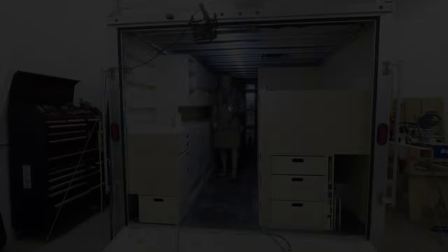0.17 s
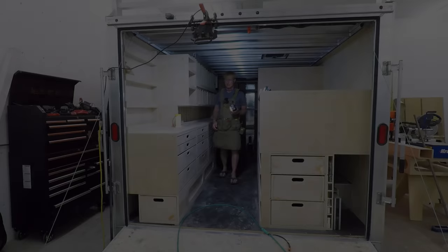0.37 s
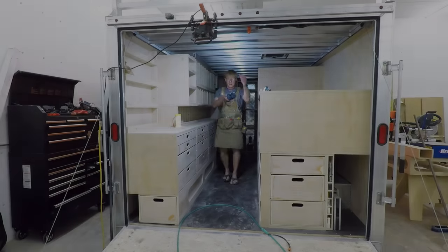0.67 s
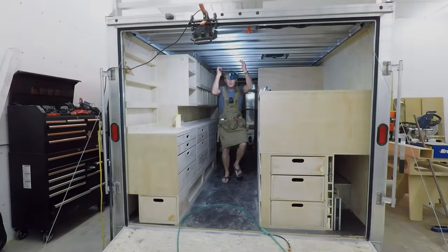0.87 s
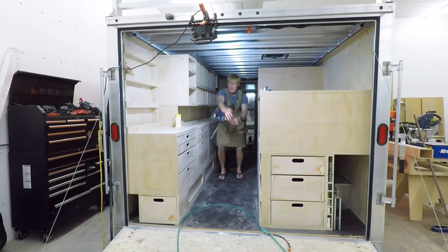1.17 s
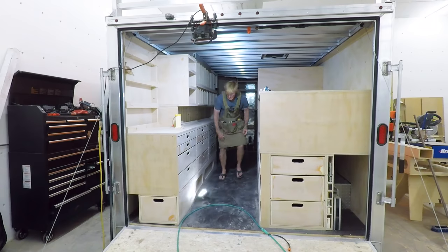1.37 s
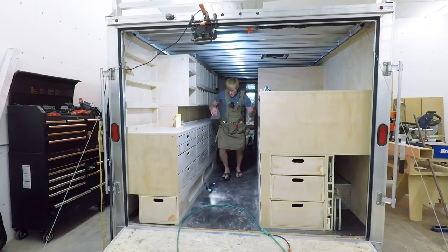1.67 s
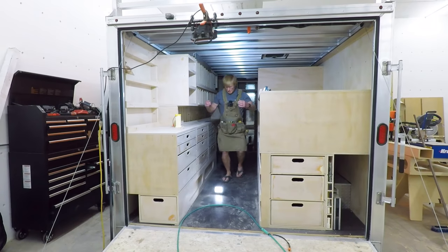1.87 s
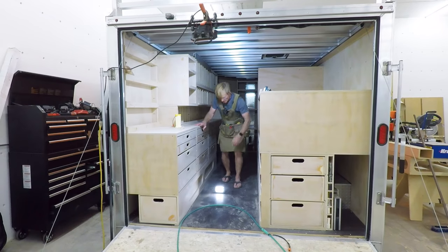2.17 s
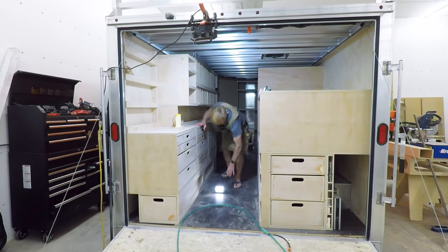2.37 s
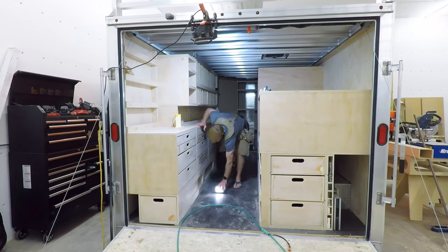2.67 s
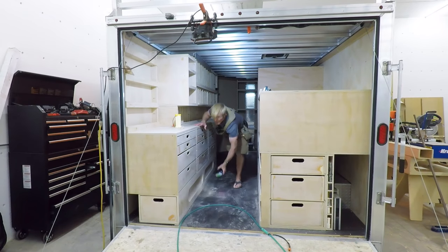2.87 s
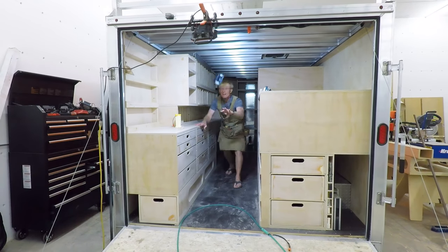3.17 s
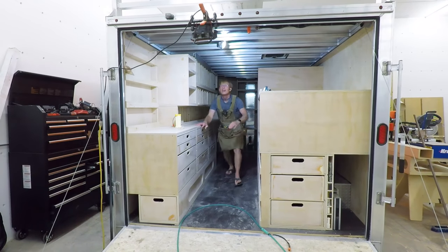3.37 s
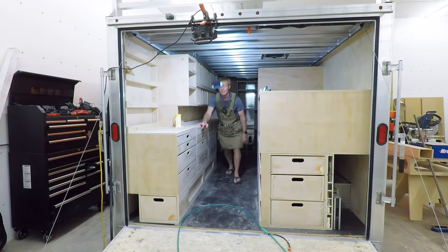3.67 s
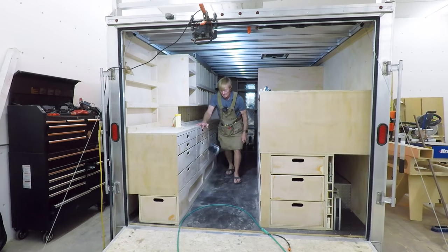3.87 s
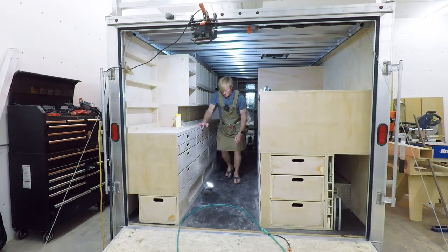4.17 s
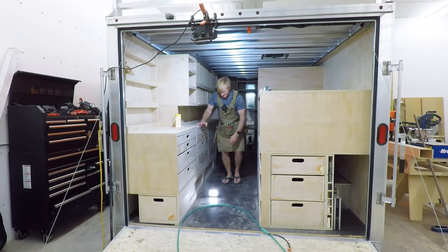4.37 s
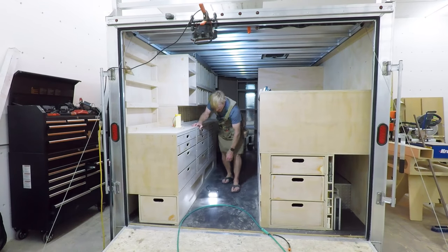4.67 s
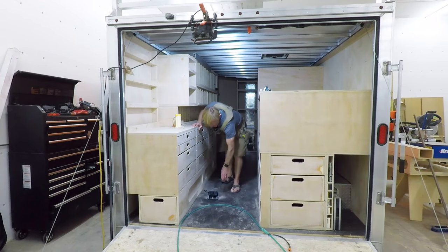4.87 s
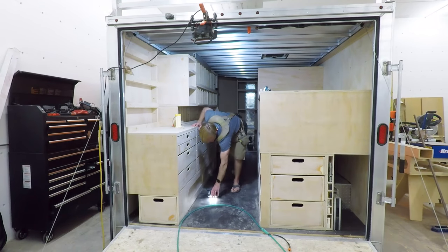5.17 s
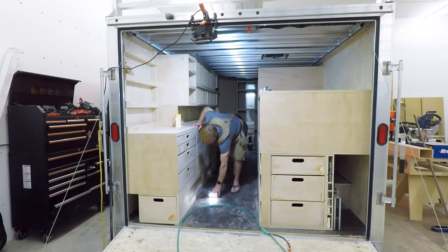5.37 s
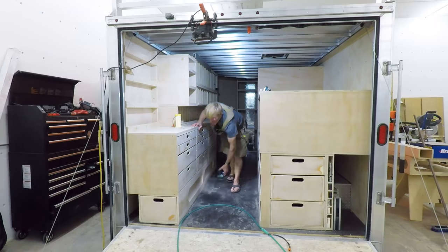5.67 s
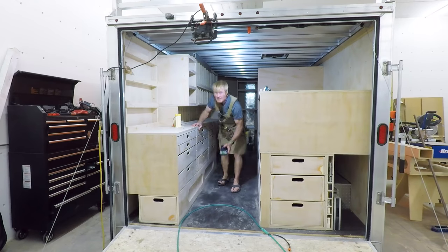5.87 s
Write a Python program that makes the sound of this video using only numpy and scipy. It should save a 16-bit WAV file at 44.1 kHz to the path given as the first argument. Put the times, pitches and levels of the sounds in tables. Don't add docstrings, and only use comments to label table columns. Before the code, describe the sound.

A hard, heavy object is dropped twice on a hollow wooden trailer floor. Each landing is a sharp crack with a dense woody thud, low body boom and long shop echo, followed by weaker knocks. Between and afterwards come small clicks, cable and cloth rustle and soft footfalls. A fixed microphone some way off clips the blows and pulls its level down, slowly recovering.

```python
import sys
import numpy as np
from scipy import signal
from scipy.fft import rfft, irfft, next_fast_len
from scipy.io import wavfile
from scipy.ndimage import map_coordinates

SR = 44100
rng = np.random.default_rng(int(sys.argv[2]) if len(sys.argv) > 2 else 0)


def store_wav(level_fs):
    pcm = np.round(np.clip(np.atleast_2d(level_fs), -1, 1) * 32767)
    wavfile.write(sys.argv[1], SR, pcm.T.astype(np.int16))


def invert_db(level):
    return 10 ** (np.asarray(level, dtype=float) / 20)


N = 265658


# start_s, dip_ahead_db, deep_pull_db, lasting_pull_db
SLAM_PULLS = [
    (1.3537, 13, 9.5, 8),
    (3.357, -1, -2, 5.5),
    (3.9799, 19, 8, 4.5),
]
REST_DB, DIP_AHEAD_S, DEEPEST_S, GRAB_S, CREEP_S = 3, .012, 0.089, 0.1, 1.69
FADE_S, FADE_DB_PER_S, OPEN_S = 0.78, 34.5, 0.19
TOP_HZ = 15400

# pitch_hz, level_db (per Hz)
HUSH_COLOUR = [(15, -58), (25, 5.5), (50, -2), (164, -13), (240, -14.5), (331, -16.5), (495, -17.5),
               (1660, -22.5), (2700, -24), (10100, -32), (15500, -36.5)]
HUSH_DB = -55

# start_s, peak_db, panel_hz, brightness_db_per_octave, ring_length (factor)
HARD_BLOWS = [(.646, -29.5, 610, 1.5, .21), (.712, -27, 400, 2, 0.33), (1.023, -32, 963, 7, 0.76),
              (1.301, -37, 600, -0.5, .5), (1.3536, 2.5, 187, -1.5, 1.7), (1.555, -36, 332, -1.4, 0.51),
              (1.709, -6, 289, -4.5, 1.1), (1.834, -11.5, 186.3, -1.6, 0.51), (1.907, -23, 214, -2.5, 0.5),
              (3.033, -41, 476, 2, .32), (3.29, -37.5, 300, 2, 0.24), (3.357, -9, 461, -1, 0.36),
              (3.98, 4.5, 520, -2.2, 0.8), (4.0294, -9, 420, 1.5, 0.82), (4.25, -14.5, 445, -1.2, 0.55),
              (4.34, -17.5, 162, -1, 1.3)]
# start_s, peak_db, panel_hz, brightness_db_per_octave, ring_length (factor)
SOFT_LANDINGS = [(1.088, -26, 395, -1.5, 0.34), (1.128, -22, 454, -1, 1.3), (1.361, .4, 400, -1.5, 1.4),
                 (1.398, -10, 220, -2.5, 1.1), (2.54, -37, 180, 2.5, 1), (2.691, -36, 161, 2, 0.72),
                 (3.129, -36, 505, 4.5, 1), (3.378, -17, 301, -.5, .5), (3.99, -2.5, 622, -2.3, 0.98),
                 (4.799, -31, 279, 0, 1.3), (5.098, -27.5, 233, -7, 1.16)]
HARD_RISE_S, SOFT_RISE_S = 0.0013, 0.0048
# pitch_hz, level_db, t60_s
PANEL_TONES = [(133, -3, 0.39), (157.6, 2, 0.17), (224, -13, 0.067), (290, 0.5, 0.18), (392, 1, 0.18),
               (455.4, -2.5, 0.29), (564, -21, 0.04), (637, -32, 0.036), (880, -52, .1), (1110, -25, .1)]
# pitch_hz, level_db (per Hz)
THUD_COLOUR = [(24, -38.5), (40, -4.5), (179, -2), (417, -5), (1310, -18.5), (1640, -23), (2110, -21.5),
               (6160, -33.5), (6980, -35.5), (14000, -45.5), (15500, -63.5)]
# pitch_hz, t60_s
THUD_LENGTH = [(60, 0.36), (300, 0.2), (1000, 0.22), (4000, 0.24), (12000, 0.036)]
# pitch_hz, level_db, t60_s
HOLLOW_TONES = [(324, 3, 0.46), (348, -6.5, 0.32), (713, -11, 0.35), (1060, -11, 0.22)]
# start_s, peak_db
HOLLOW_KNOCK = (1.126, -20.5)

# start_s, start_db (rms at full gain), brightness_db_per_octave, length (factor), boom_top_hz
SHOP_ANSWERS = [(.646, -46, 6, 0.44, 1300), (1.099, -40, 2.5, 0.52, 1300), (1.3538, -7.5, -.2, 0.93, 1300),
                (1.709, -23, -2, 0.89, 1500), (1.835, -28.5, 2.1, 0.83, 1580),
                (1.907, -37.5, 0.5, 1.7, 1460), (2.54, -51, 2.5, 0.46, 1500), (2.69, -54.5, 3, 0.52, 1400),
                (3.136, -53, 7, 0.6, 598.6), (3.357, -19, -4.6, .74, 780), (3.98, -8.5, .8, 1.12, 1420),
                (4.25, -19.5, -0.1, 0.83, 1460), (4.34, -32, 0.5, 1.4, 1430), (5.096, -48, -11, 1.02, 1300)]
# pitch_hz, t60_s
SHOP_LENGTH = [(60, 1.66), (250, 1.4), (800, 1.66), (1100, 1.94), (1400, 1.79), (1800, 1.75), (3000, 1.55),
               (6000, 1.44), (12000, 0.42)]
# pitch_hz, level_db (per Hz)
SHOP_COLOUR = [(40, -25), (70, -3), (125, -4.5), (160, -4), (230, 0.5), (400, -5), (800, -10.5),
               (1400, -20), (2800, -22), (4600, -32), (8000, -42), (12000, -54), (15600, -85.5)]
# pitch_hz, width_hz, boost_db
TRAILER_TONES = [(162, 14.6, 4.5), (230.4, 12, 3), (300, 11, 5.5), (384, 17, 2.5), (458, 33, 3.5),
                 (570, 12, 1.5), (658, 17, 1.5), (1060, 90, -1)]
ABOVE_BOOM_DB = -5.5

# start_s, peak_db
HARD_TICKS = [(.6462, -25), (.6874, -29.5), (.7457, -31), (.815, -34), (.8744, -40), (1.0244, -22),
              (1.07, -38), (1.3014, -42), (1.5544, -42), (1.7095, -18), (1.8342, -28), (1.907, -33),
              (2.086, -26.5), (2.602, -45), (2.693, -43), (2.7766, -36), (2.819, -41), (2.8943, -38),
              (3.035, -38), (3.1274, -49), (3.207, -38), (3.2824, -38), (3.8761, -41), (4.031, -28),
              (4.2214, -35), (4.2514, -23), (4.583, -40), (5.255, -46), (5.7094, -41), (5.9797, -39)]
# start_s, peak_db
GRIT_TICKS = [(.6574, -45), (.6689, -35), (.8195, -34), (.8834, -46), (.9567, -42), (1.0789, -36),
              (1.9314, -45), (2.1144, -42), (2.3194, -38), (3.1494, -47), (3.358, -22), (3.366, -30),
              (4.341, -39), (4.8668, -44), (5.3916, -47), (5.5553, -49.5), (5.8494, -54)]
# start_s, peak_db
JOINT_SLIPS = [(5.184, -39), (5.2105, -37), (5.2345, -34.5), (5.2395, -36), (5.2812, -32), (5.3028, -33.5),
               (5.3453, -35.5)]
# start_s, peak_db, pitch_hz, t60_s, width (share of pitch)
SHARP_CRACKS = [
    (1.3536, -12, 4500, .008, .85),
    (1.3590, 0, 4200, .007, .85),
    (3.9798, -19, 3000, .008, .85),
    (3.9872, 0, 4700, .007, .45),
]
# start_s, peak_db, pitch_hz, t60_s, width (share of pitch)
DULL_KNOCKS = [(.6465, -25.5, 794, .025, .75), (1.015, -42, 600, 0.04, .75), (1.302, -40, 905, .02, .75),
               (1.555, -24, 800, .02, .75), (1.096, -24, 900, .03, .75), (1.127, -25, 735, 0.028, .55),
               (2.692, -37, 1150, 0.026, .75), (3.034, -37.5, 520, 0.027, .75),
               (3.359, -20, 2000, 0.041, .75), (3.379, -18, 2400, 0.045, .75), (5.108, -38, 2600, .02, .3)]
# pitch_hz, t60_s, width (share of pitch), pitch scatter (share)
TICK, SPECK, CREAK = (2300, 0.0084, 1.54, 0.18), (7200, 0.0077, 1.1, .05), (1700, .011, .55, 0.03)

# start_s, peak_db, pitch_hz, t60_s
TONES_AND_CLICKS = [(1.015, -36, 690, .12), (1.022, -34, 1040, .1), (1.357, -15, 388, .15),
                    (1.357, -16, 720, .2), (1.36, -14, 221, .4), (1.42, -18, 46, .4), (1.71, -20, 45, .25),
                    (3.14, -30, 110, .25), (3.364, -11, 43.6, .29), (3.358, -12, 300, .06),
                    (3.377, -12, 310, .16), (3.38, -24, 163, .09), (3.6, -33, 288, .9),
                    (3.379, -23, 1100, .06), (3.381, -24, 1450, .06), (3.358, -28, 1700, .05),
                    (3.379, -26, 2050, .05), (3.43, -28, 802, .25), (3.985, -12, 441, .15),
                    (3.992, -8, 135, .09), (3.984, -11, 225, .13), (3.997, -12, 400, .1),
                    (3.995, -24, 900, .1), (3.98, -12, 300, .08), (4.003, -6, 150, .06),
                    (3.99, -24, 2132, .07), (3.99, -26, 2800, .06), (4.02, -17, 46, .35),
                    (4.031, -26, 3300, .05), (4.805, -36, 242, .4), (4.805, -35, 377, .3),
                    (5.098, -34, 265, .25), (5.1, -37, 355, .12), (1.8355, -19, 190, .045),
                    (1.711, -15, 330, .08), (2.54, -41, 120, .3),
                    (.647, -35, 3300, .008), (.657, -42, 5500, .004), (.884, -43, 4300, .005),
                (1.0245, -27, 4600, .008), (1.254, -45, 7000, .004), (1.303, -38, 900, .012),
                (1.555, -21, 820, .02), (2.516, -47, 4500, .004), (2.537, -47, 3500, .004),
                (2.79, -46, 5000, .005), (2.92, -47, 2700, .005), (3.271, -44, 1800, .008),
                (3.328, -47, 2000, .005), (5.21, -49, 7000, .003), (5.281, -48, 6500, .003),
                (5.303, -50, 8000, .003), (5.345, -49, 6500, .003), (5.681, -50, 4000, .003),
                (5.688, -48, 3500, .003), (5.8, -51, 6000, .003), (5.815, -48, 1700, .015),
                    (1.15, -33, 108, .2), (1.358, -12, 377, .12), (1.36, -15, 657, .1), (1.375, -24, 872, .08),
                 (1.428, -16, 205, .15), (1.505, -30, 807, .12), (1.528, -24, 226, .25),
                 (1.71, -17, 161, .1), (1.74, -22, 409, .12), (1.835, -21, 280, .08), (2.087, -33, 108, .2),
                 (3.17, -31, 75, .3), (3.36, -25, 560, .08), (3.495, -22, 183, .2), (3.82, -39, 280, .3),
                 (3.15, -36, 200, .12), (1.124, -31, 500, .07), (1.13, -36, 1260, .07),
                 (1.2, -38, 715, .08), (1.085, -36, 610, .15), (4.25, -20, 480, .07),
                 (1.925, -36, 2150, .05), (5.2, -44, 100, .4), (5.265, -42, 95, .25), (3.982, -8, 475, .12),
                 (3.98, -16, 678, .08), (3.98, -18, 797, .07), (3.986, -7, 258, .13),
                 (1.709, -19, 1150, .025), (1.838, -28, 1150, .07), (1.9075, -33, 3800, .008),
                 (1.41, -26, 1600, .04), (4.015, -19, 571, .15), (4.34, -25, 151, .15),
                 (4.37, -25, 269, .15), (4.415, -32, 571, .15), (1.928, -40, 8500, .005),
                 (1.66, -47, 10000, .005), (5.254, -42, 3400, .006), (5.33, -50, 2600, .005),
                 (5.162, -48, 4500, .005), (2.603, -44, 1500, .008)]
TONE_RISE_CYCLES = 0.7

# start_s, hold_s, level_db, dull_part_db (over the rustle)
HANDLING = [(.656, 0.036, -54, 15.5), (0.696, 0.05, -47, 4), (0.8, .05, -59, 6), (0.875, 0.012, -53, 3),
            (.9, .05, -59, 6), (.962, .06, -54, 10), (1.029, .004, -42, 13.5), (1.07, 0.043, -48, 15),
            (1.131, 0.065, -44.5, 11.5), (1.306, 0.03, -56, 11), (1.374, .012, -36, 9),
            (1.41, .004, -39, 2), (1.44, .02, -52, 0), (1.5, .2, -64, 0), (1.72, .03, -45, 0),
            (1.76, .02, -54, 0), (1.84, .03, -54, 0), (1.93, .03, -57, 0), (2.096, 0.04, -46, 7),
            (2.293, 0.29, -58, 10), (2.78, .005, -52.5, 3), (2.8, 0.18, -60.5, 5),
            (3.043, 0.006, -49.5, -8), (3.16, 0.0039, -52, 9), (3.373, .012, -42, 0), (3.39, .025, -49, 0),
            (3.425, .02, -45, 4), (3.458, 0.045, -47.5, 7), (3.54, 0.1, -59.5, 12.5), (3.875, .07, -55, 9),
            (4.003, .008, -39.5, 13), (4.033, .005, -40.5, 25), (4.07, .01, -52, 0), (4.225, .02, -55, 0),
            (4.255, .03, -49.5, 0), (4.345, .02, -55, 0), (4.4, .15, -61, 0), (4.59, .005, -48, 10),
            (4.55, .1, -57.5, 0), (4.66, .12, -59, 0), (2.553, .012, -56, 3), (3.06, .035, -56, -3),
            (4.86, 0.0024, -58, 2), (4.958, 0.28, -61, 6.5), (5.385, .018, -55, -3),
            (5.56, .22, -68.5, 7.5), (5.681, .005, -60, 11), (5.83, 0.065, -58.5, 9.5)]
RUSTLE_RISE, RUSTLE_FALL = 660, 430
# pitch_hz, level_db (per Hz)
CLOTH_COLOUR = [(3000, -3.5), (5000, -1.5), (8000, -5.5), (13000, -12), (15500, -22)]
# pitch_hz, level_db (per Hz)
RUB_COLOUR = [(200, -20), (600, 7), (1500, -3.5), (3000, -6.5), (5000, -20.5), (7000, -47)]

# start_s, hold_s, level_db
BODY_SWAY = [(.7, 0.1, -38), (.97, 0.02, -26), (1.14, 0.14, -39.5), (1.362, .05, -25), (1.43, .07, -25),
             (1.56, 0.11, -31), (1.715, 0.01, -23), (1.84, 0.2, -30), (2.11, 0.091, -31), (2.26, .12, -45),
             (3.16, .04, -33), (3.366, 0.018, -20), (3.47, 0.19, -35), (3.7, 0.35, -37), (4.03, .045, -21),
             (4.12, 0.14, -33), (4.255, .02, -22.5), (4.34, .06, -32), (4.42, 0.022, -27.5),
             (4.5, 0.21, -33), (4.72, .2, -38), (5.11, .02, -41), (5.25, 0.013, -45), (5.9, .04, -51.5)]
SWAY_RISE, SWAY_FALL = 1400, 214
# pitch_hz, level_db (per Hz)
BOOM_COLOUR = [(16, -41), (28, -5), (45, 0.5), (58, -8.5), (75, -12), (110, -19), (160, -55.5), (500, -110)]

# start_s, level_db (rms at full gain), pitch_hz, width_octaves, t60_s
CABINET_RATTLES = [(3.985, -19, 520, .3, 1.7), (3.47, -27, 420, .25, .3), (3.56, -33, 160, .12, 1.3),
                   (3.382, -34, 1250, .45, .18), (4.25, -34, 2300, .6, .6), (3.41, -29, 780, .2, .3),
                   (1.88, -27, 152, .12, .9), (2.53, -53, 1300, .4, .5)]

# start_s, peak_db, panel_hz, t60_s, early_pitch_drop (0-1)
FOOTFALLS = [
    (2.688, -38, 121.3, .27, 0),
    (3.137, -30, 63.7, .24, .6),
    (4.801, -29, 125.9, 0.2, 0.03),
    (5.098, -27, 132, 0.26, 0.08),
    (5.405, -40, 119, 0.17, .02),
]
OVERTONE = 2.01

# pitch_hz, level_db (per Hz)
HISS_COLOUR = [(1000, -30), (5000, -8), (9000, -3), (12000, 0), (15500, -2)]
HISS_DB = -74


def unit(x):
    return x / np.sqrt(np.mean(x ** 2) + 1e-20)


def along(points, hz):
    f, v = np.transpose(points)
    return np.interp(np.log(hz + 1), np.log(f + 1), v)


def noise(colour):
    size = next_fast_len(N)
    level = invert_db(along(colour, np.fft.rfftfreq(size, 1 / SR)))
    return unit(irfft(rfft(rng.standard_normal(size)) * level, size)[:N])


def wander(spacing):
    return map_coordinates(rng.standard_normal(N // spacing + 4), [np.arange(N) / spacing])


def dying(size, colour_db, t60, window=256):
    hz, t, z = signal.stft(rng.standard_normal(size), SR, nperseg=window)
    z = z * invert_db(colour_db(hz)[:, None] - 60 * t / t60(hz)[:, None])
    return signal.istft(z, SR, nperseg=window)[1][:size]


def swells(rows, rise, fall):
    t, level_db = np.arange(N) / SR, np.full(N, -120.)
    for s, hold, db in rows:
        before, after = np.maximum(s - t, 0), np.maximum(t - s - hold, 0)
        level_db = np.maximum(level_db, db - rise * before - fall * after)
    return level_db


def gain_db(t):
    opening = 20 * np.log10(np.clip(t / OPEN_S, 1e-2, 1))
    db = REST_DB + opening - FADE_DB_PER_S * np.maximum(FADE_S - t, 0)
    for s, ahead_db, deep_db, lasting_db in SLAM_PULLS:
        since = np.maximum(t - s, 0)
        db = db - ahead_db * (t < s) * np.clip(1 - (s - t) / DIP_AHEAD_S, 0, 1)
        db = db - deep_db * since / DEEPEST_S * np.exp(1 - since / DEEPEST_S)
        db = db - lasting_db * (1 - np.exp(-since / GRAB_S)) * np.exp(-since / CREEP_S)
    return db


def add(track, s, db, sound):
    before_gain = db - gain_db(s + 1e-4)
    track[round(s * SR):][:len(sound)] += invert_db(before_gain) * sound / np.max(np.abs(sound))


def add_tail(track, s, db, tail, rise_s):
    swell = 1 - np.exp(-np.arange(len(tail)) / SR / rise_s)
    track[round(s * SR):][:len(tail)] += invert_db(db) * tail / np.std(tail[:SR // 20]) * swell


def ring(modes, t, stretch, scatter_db, attack, drop=0, settle=.01):
    strengths = rng.standard_normal(len(modes))
    clock = t + drop * settle * (1 - np.exp(-t / settle))
    total = np.zeros(len(t))
    for i, (hz, db, t60) in enumerate(modes):
        side = (-1) ** i
        level = invert_db(db + scatter_db * strengths[i] - 60 * t / (t60 * stretch))
        total += side * level * np.sin(2 * np.pi * hz * clock)
    return total * (1 - np.exp(-t / attack))


def hush():
    return invert_db(HUSH_DB + 2.0 + 1.3 * wander(2500)) * noise(HUSH_COLOUR)


def blows():
    out, t = np.zeros(N + SR), np.arange(SR // 2) / SR
    for rows, rise in ((HARD_BLOWS, HARD_RISE_S), (SOFT_LANDINGS, SOFT_RISE_S)):
        for s, db, hz, bright_db, stretch in rows:
            colour = lambda f: along(THUD_COLOUR, f) + bright_db * np.log2(1 + f / 500)
            length = lambda f: stretch * along(THUD_LENGTH, f)
            thud = dying(len(t), colour, length, window=570) * (1 - np.exp(-t / rise))
            dulling = min(bright_db, 0)
            panels = [(f, level + dulling * np.log2(1 + f / 150), t60) for f, level, t60 in PANEL_TONES]
            panels.append((hz, 7, .15))
            ringing = ring(panels, t, stretch, scatter_db=5.0, attack=rise)
            add(out, s, db, unit(thud) + 0.77 * unit(ringing))
    hollow = ring(HOLLOW_TONES, t, 0.75, scatter_db=0.0, attack=0.019, drop=0.595, settle=0.0039)
    add(out, *HOLLOW_KNOCK, hollow)
    return out[:N]


def shop():
    out = np.zeros(N + 3 * SR)
    for s, db, bright_db, stretch, edge_hz in SHOP_ANSWERS:
        def colour(f):
            level = along(SHOP_COLOUR, f) + bright_db * np.log2(1 + f / 300)
            level = level + ABOVE_BOOM_DB * np.clip((f / edge_hz - 1) / 0.09, 0, 1)
            for hz, width_hz, boost_db in TRAILER_TONES:
                level = level + boost_db * np.exp(-((f - hz) / width_hz) ** 2)
            return level
        tail = dying(2 * SR, colour, lambda f: stretch * along(SHOP_LENGTH, f), window=2500)
        add_tail(out, s, db, tail, rise_s=0.013)
    return out[:N]


def alike(rows, hz, t60, width, scatter):
    return [(s, db, hz * np.exp(scatter * rng.standard_normal()), t60, width) for s, db in rows]


def ticks():
    out, t = np.zeros(N + SR), np.arange(SR // 10) / SR
    f = np.fft.rfftfreq(len(t), 1 / SR)
    rows = alike(HARD_TICKS, *TICK) + alike(GRIT_TICKS, *SPECK) + alike(JOINT_SLIPS, *CREAK)
    for s, db, hz, t60, width in rows + SHARP_CRACKS + DULL_KNOCKS:
        burst = rng.standard_normal(len(t)) * invert_db(-60 * t / t60)
        burst[0] = 3.6
        spread = 1j * f * hz * width
        body = spread / (hz * hz - f * f + spread)
        add(out, s, db - 2.5, irfft(rfft(burst) * body ** 2, len(t)))
    return out[:N]


def tones():
    out, t = np.zeros(N + SR), np.arange(SR // 2) / SR
    for s, db, hz, t60 in TONES_AND_CLICKS:
        swell = 1 - np.exp(-t * hz / TONE_RISE_CYCLES)
        add(out, s, db, invert_db(-60 * t / t60) * np.sin(2 * np.pi * hz * t) * swell)
    return out[:N]


def handling():
    bright_rows = [(s, hold, db) for s, hold, db, dull in HANDLING]
    dull_rows = [(s, hold, db + dull) for s, hold, db, dull in HANDLING]
    bright_db = swells(bright_rows, RUSTLE_RISE, RUSTLE_FALL)
    dull_db = swells(dull_rows, RUSTLE_RISE, RUSTLE_FALL)
    grain = invert_db(2.2 * wander(64))
    bright = invert_db(bright_db - 2.5) * unit(grain * noise(CLOTH_COLOUR))
    return bright + invert_db(dull_db - 7.0) * unit(grain * noise(RUB_COLOUR))


def boom():
    return invert_db(swells(BODY_SWAY, SWAY_RISE, SWAY_FALL) - 4) * noise(BOOM_COLOUR)


def rattles():
    out = np.zeros(N + 3 * SR)
    for s, db, hz, octaves, t60 in CABINET_RATTLES:
        colour = lambda f: -9 * (np.log2((f + 1) / hz) / octaves) ** 2
        tail = dying(SR, colour, lambda f: t60 + 0 * f, window=1024)
        add_tail(out, s, db, tail, rise_s=.02)
    return out[:N]


def steps():
    out, t = np.zeros(N + SR), np.arange(SR // 2) / SR
    for s, db, low_hz, t60, drop in FOOTFALLS:
        high_hz = OVERTONE * low_hz
        modes = [(low_hz, 0, t60), (high_hz, -3, 1.06 * t60), (1.16 * high_hz, -7, 0.44 * t60)]
        add(out, s, db, ring(modes, t, 1, scatter_db=0.5, attack=0.0056, drop=drop, settle=0.027))
    return out[:N]


def scene():
    moving = (handling() + boom()) / invert_db(gain_db(np.arange(N) / SR))
    return (hush() + blows() + shop() + ticks() + tones() + moving + rattles() + steps())[None]


def band_limit(x):
    return signal.sosfilt(signal.butter(12, 16410, fs=SR, output="sos"), x)


def record(dry):
    t = np.arange(N) / SR
    x = dry * invert_db(gain_db(t))
    x = x + invert_db(HISS_DB - FADE_DB_PER_S * np.maximum(FADE_S - t, 0)) * noise(HISS_COLOUR)
    x = x / (1 + np.abs(x / .79) ** 5) ** (1 / 5)
    x = signal.sosfilt(signal.ellip(10, .5, 45, TOP_HZ, fs=SR, output="sos"), x)
    return band_limit(x)


dry = scene()
out = record(dry)
store_wav(out)
```